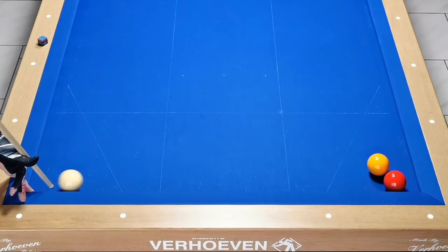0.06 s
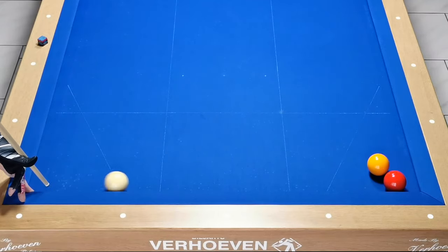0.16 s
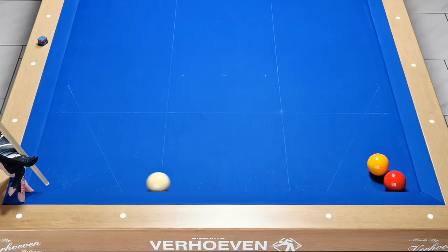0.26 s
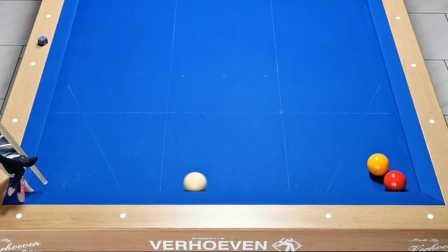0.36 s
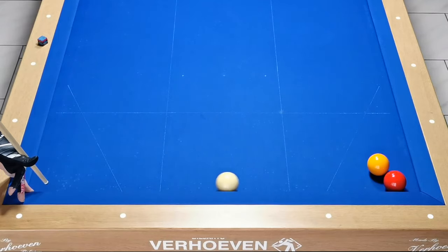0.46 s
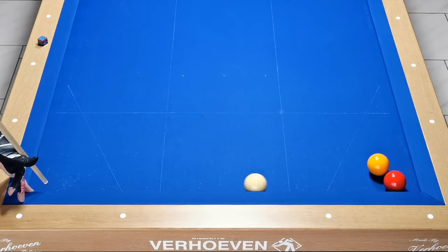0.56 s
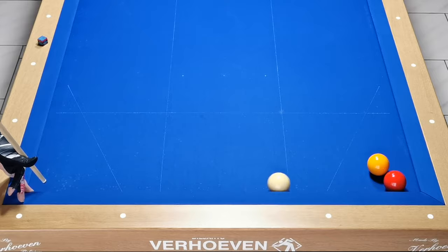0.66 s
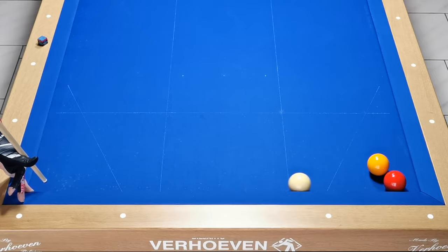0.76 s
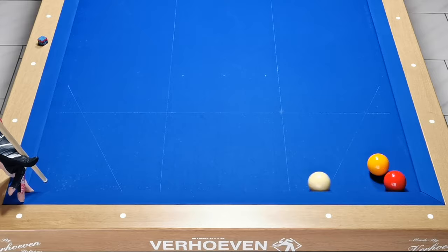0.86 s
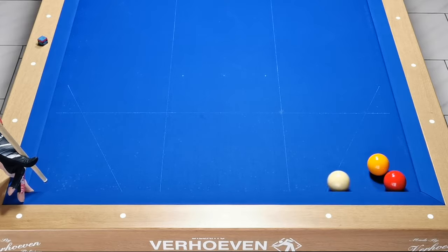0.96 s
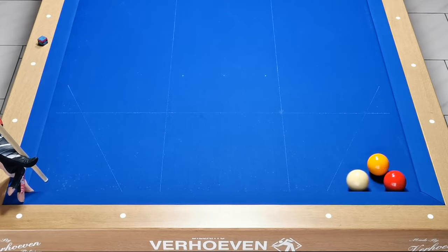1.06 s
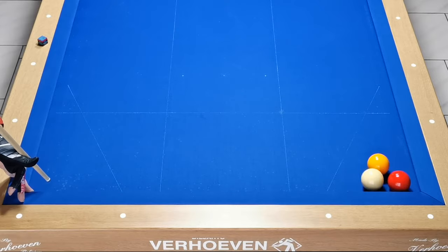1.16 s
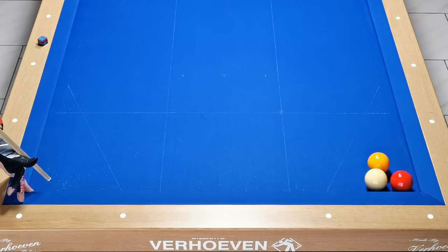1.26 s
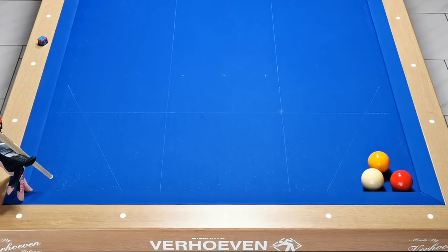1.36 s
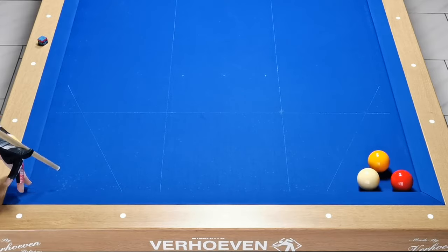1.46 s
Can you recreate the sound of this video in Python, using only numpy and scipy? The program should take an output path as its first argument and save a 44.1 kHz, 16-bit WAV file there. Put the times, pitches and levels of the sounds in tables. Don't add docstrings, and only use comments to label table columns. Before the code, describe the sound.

A cue knocks a billiard ball, which rolls almost silently, then clicks softly against two others

```python
import sys
import numpy as np
from scipy import signal
from scipy.fft import rfft, irfft
from scipy.io import wavfile

SR = 44100
rng = np.random.default_rng(int(sys.argv[2]) if len(sys.argv) > 2 else 0)


def output_pcm(signal):
    pcm = np.clip(np.atleast_2d(signal).T, -1, 1) * 32767
    wavfile.write(sys.argv[1], SR, np.round(pcm).astype(np.int16))


def field_ratio(decibels):
    return 10 ** (np.asarray(decibels, dtype=float) / 20)


N = 66150

# pitch_hz, level_db
HUM_PARTIALS = [(100, -68.5), (150, -85), (200, -100.5), (300, -91), (350, -86)]
# freq_hz, level_db (per Hz)
HISS_COLOUR = [(25, 0), (110, 15), (220, 11), (420, -1), (1000, -4.5), (3000, -8), (11800, -14),
               (12400, -29.5)]
# freq_hz, level_db (per Hz)
KNOCK_COLOUR = [(70, -22.5), (150, -5.5), (1400, -10), (2200, -20.5), (3300, -33.5), (4200, -41),
                (9000, -52), (15500, -72)]
# pitch_hz, width_hz, lift_db
SHAFT_LIFTS = [(647, 86, 5.5), (747.5, 120, 6.5), (1336, 47, 4), (1770, 250, 5.5), (3095, 700, 5),
               (9500, 1600, 1)]
# pitch_hz, width_hz, level_db
SHAFT_RINGS = [(770, 290, -10.5), (1327, 140, -2), (1600, 310, -9), (3002.6, 500, -25.5), (3900, 350, -36),
               (5900, 400, -44)]
# freq_hz, level_db
NEAR_COLOUR = [(300, -5), (1300, 1.5), (3000, 0.5), (6000, -2.5), (11000, -7.5), (14000, -16)]
# delay_s, left_db, right_db
CUE_ECHOES = [(.0017, 7, 8.5), (.0055, -3.5, 0), (.008, 2.5, 3.5), (0.0105, 3.5, -6.5), (.0138, -11, 3),
              (0.016, -7, -9), (.0178, -8, -9)]
# freq_hz, left_minus_right_db
CUE_TILT = [(60, 6), (160, 3.5), (400, -2.5), (1050, -3.5), (2710, -1.5)]
# pitch_hz, level_db, t60_s, first_swing (+1 or -1)
FRAME_MODES = [(25.3, -41, 3.2, 1), (39.5, -44, 1.5, -1), (57, -35.5, 1.9, -1), (63.9, -26.5, 2.2, 1),
               (64.5, -30, .5, -1), (125.5, -37, 1.2, -1), (137.3, -30, 1.0, 1), (110, -39, .6, 1),
               (152, -35, .5, 1), (167, -32, .45, 1), (190, -52, 2.0, 1), (227, -34, .4, 1),
               (288, -33, .5, 1), (340, -32, .4, 1)]
# start_s, level_db, t60_s
CLOTH_TICKS = [
    (.487, -69, .11),
    (.905, -77, 0.066),
    (1.2927, -66.5, 0.037),
]
# start_s, level_db, bright_db
CLICKS = [
    (1.314, -18.5, -38),
    (1.459, -23.5, -47),
]
# delay_s, body_db, bright_db, left_minus_right_db, right_lag_s
CLICK_PATHS = [(.0001, -13.5, 0.5, -8, .0001), (.0014, -17.5, 0, 7, .0001), (.0038, -18, -16, 11, .0003),
               (.0082, 6.5, -6.5, -3, .00042), (0.0142, -11, -9, -13, -.0009),
               (0.0184, -23, -20, 3, -0.0067), (0.0311, -13, -24, -11, 0.011)]
# freq_hz, level_db
BRIGHT_COLOUR = [(3000, -61), (4300, -47), (5600, -21), (8600, 2), (10500, -3.5), (12600, 8.5), (14500, 7),
                 (16000, 0)]
# freq_hz, level_db
SPREAD_COLOUR = [(150, -19.5), (800, -9.5), (1900, 7.5), (2900, 5.5), (4300, 1.5), (8500, 7.5), (12700, 29),
                 (14000, -20)]
# freq_hz, t60_s
ROOM_T60 = [(100, 1), (300, 0.6), (1000, 0.68), (3000, 0.73), (6000, 0.45), (10000, 0.54), (15000, 0.19)]
# freq_hz, likeness (0 to 1)
LIKENESS = [(60, .98), (250, 0.73), (700, 0.25), (2000, .2), (8000, .2)]

CUE_S = .2071


def evened(x):
    return x / np.sqrt(np.mean(x ** 2) + 1e-20)


def read(points, hz):
    f, value = np.transpose(points)
    return np.interp(np.log(hz + 1), np.log(f + 1), value)


def add(mix, s, sound):
    part = mix[max(round(s * SR), 0):][:len(sound)]
    part += sound[:len(part)]


def band(x, order, edges_hz, kind):
    return signal.sosfilt(signal.butter(order, edges_hz, kind, fs=SR, output="sos"), x)


def causal(db):
    mirrored = np.r_[db, db[-2:0:-1]]
    log_gain = np.log(field_ratio(np.maximum(mirrored, -100)))
    h = np.fft.ifft(np.exp(signal.hilbert(log_gain).conj())).real[:2048]
    return h / abs(h).max()


def ring(x, hz, width):
    r = np.exp(-np.pi * width / SR)
    return signal.lfilter([1, -1], [1, -2 * r * np.cos(2 * np.pi * hz / SR), r * r], x)


def pair(size, like, shape):
    a, b, c, d = rng.standard_normal((4,) + shape.shape)
    same = np.clip(like, -1, 1)
    left = a + 1j * b
    right = same * left + np.sqrt(1 - same ** 2) * (c + 1j * d)
    z = np.array([left, right]) * shape
    return signal.istft(z, nperseg=size, noverlap=size * 3 // 4)[1][:, :N]


def room(x, gap_s):
    sag_s, sag_db, sag_rise_s = .31, -7, 0.01
    hz = np.fft.rfftfreq(512, 1 / SR)[:, None]
    t = np.arange(420) * 128 / SR
    tail = pair(512, read(LIKENESS, hz), field_ratio(-60 * t / read(ROOM_T60, hz)))
    t = np.arange(tail.shape[1]) / SR
    sag = field_ratio(sag_db / (1 + np.exp((sag_s - t) / sag_rise_s)))
    tail = tail * np.clip(t / gap_s, 0, 1) ** 2 * sag
    return signal.fftconvolve(x[None], tail / np.linalg.norm(tail[0]), axes=1)[:, :N]


def background():
    swell_db, swell_s, hiss_db, least_likeness = 2, .8, -80.5, 0.16
    t = np.arange(N) / SR
    hum = 0
    for hz, db in HUM_PARTIALS:
        waver_db = 2.5 * np.sin(2 * np.pi * (rng.uniform(3.2, 3.7) * t + rng.random()))
        tone = np.sin(2 * np.pi * (hz * t + rng.random()))
        hum = hum + np.sqrt(2) * field_ratio(db + waver_db) * tone
    swell = field_ratio(swell_db * (t > CUE_S) * np.exp(-np.maximum(t - CUE_S, 0) / swell_s))
    hz = np.fft.rfftfreq(2048, 1 / SR)[:, None]
    steady = field_ratio(read(HISS_COLOUR, hz)) * np.ones(N // 512 + 5)
    hiss = pair(2048, np.maximum(read(LIKENESS, hz), least_likeness), steady)
    high = band(hiss.mean(0), 4, 400, "high")
    return hum * swell * field_ratio([[1.5], [-1.5]]) + field_ratio(hiss_db) * hiss / high.std()


def tip_snap():
    level_db, decay_s = -40.5, 0.0057
    noise = band(rng.standard_normal(900), 3, [5600, 11600], "band")
    return field_ratio(level_db) * np.exp(-np.arange(900) / SR / decay_s) * evened(noise)


def cue():
    level_db, direct_db, wet_db = -15.5, -3, 2.5
    hz = np.fft.rfftfreq(8192, 1 / SR)
    colour = read(KNOCK_COLOUR, hz)
    for f, width, db in SHAFT_LIFTS:
        colour = colour + db / (1 + (2 * (hz - f) / width) ** 2)
    t = np.arange(2048) / SR
    ringing = 0
    for f, width, db in SHAFT_RINGS:
        ringing = ringing + field_ratio(db) * np.exp(-np.pi * width * t) * np.sin(2 * np.pi * f * t)
    knock = causal(colour + read(NEAR_COLOUR, hz)) + ringing * (1 - np.exp(-t / 0.00027))
    out, to_room = np.zeros((2, N)), np.zeros(N)
    add(to_room, CUE_S, causal(colour))
    for side in out:
        add(side, CUE_S, -field_ratio(direct_db) * knock)
    for delay, left_db, right_db in CUE_ECHOES:
        add(out[0], CUE_S + delay, field_ratio(left_db) * knock)
        add(out[1], CUE_S + delay, field_ratio(right_db) * knock)
    out = field_ratio(level_db) * out + field_ratio(wet_db) * room(to_room, 0.0042)
    tilt_db = read(CUE_TILT, np.fft.rfftfreq(N, 1 / SR)) * np.array([[.5], [-.5]])
    out = irfft(rfft(out) * field_ratio(tilt_db), N)
    for side in out:
        add(side, CUE_S - .0018, tip_snap())
    return out


def frame():
    lag_s, rise_s, pan_db = .024, 0.0054, 3.8
    t = np.maximum(np.arange(N) / SR - CUE_S - lag_s, 0)
    boom = 0
    for hz, db, t60, sense in FRAME_MODES:
        boom = boom + sense * field_ratio(db - 60 * t / t60) * np.sin(2 * np.pi * hz * t)
    return boom * (1 - np.exp(-t / rise_s)) * field_ratio(pan_db * np.array([[.5], [-.5]]))


def ticks():
    out, t = np.zeros((2, N)), np.arange(5000) / SR
    for s, db, t60 in CLOTH_TICKS:
        for side in out:
            scuff = ring(rng.standard_normal(5000), 10700, 9000)
            add(side, s, field_ratio(db - 60 * t / t60) * evened(scuff))
    return out


def balls():
    contact_s, body_hz, body_width_hz = .0005, 1851, 1100
    thud_hz, thud_width_hz, thud_db, wet_db = 856, 520, -18.5, -1.5
    phase = np.clip(np.arange(1500) / SR / contact_s, 0, 1)
    force = abs(np.sin(np.pi * phase)) ** 1.5
    body = force
    for _ in range(5):
        body = ring(body, body_hz, body_width_hz)
    thud = ring(ring(force, thud_hz, thud_width_hz), thud_hz, thud_width_hz)
    hz = np.fft.rfftfreq(8192, 1 / SR)
    bright = np.convolve(force, causal(read(BRIGHT_COLOUR, hz)))[:1500]
    spread = np.convolve(force, causal(read(SPREAD_COLOUR, hz)))[:1500]
    body, thud, bright, spread = (v / abs(v).max() for v in (body, thud, bright, spread))
    out, to_room = np.zeros((2, N)), np.zeros(N)
    for s, db, bright_db in CLICKS:
        add(to_room, s, field_ratio(db + wet_db) * spread)
        for delay, body_db, edge_db, pan_db, lag in CLICK_PATHS:
            sound = field_ratio(db + body_db) * body + field_ratio(bright_db + edge_db) * bright
            add(out[0], s + delay, field_ratio(pan_db / 2) * sound)
            add(out[1], s + delay + lag, field_ratio(-pan_db / 2) * sound)
        for side in out:
            add(side, s + 0.0011, field_ratio(db + thud_db) * thud)
    return out + room(to_room, 0.0067)


def scene():
    return background() + cue() + frame() + ticks() + balls()


def top_cut(x):
    return signal.sosfilt(signal.butter(12, 15750, fs=SR, output="sos"), x)


def record(dry):
    limited = signal.sosfilt(signal.ellip(8, .5, 60, 15750, fs=SR, output="sos"), dry)
    return top_cut(limited)


dry = scene()
out = record(dry)
output_pcm(out)
```